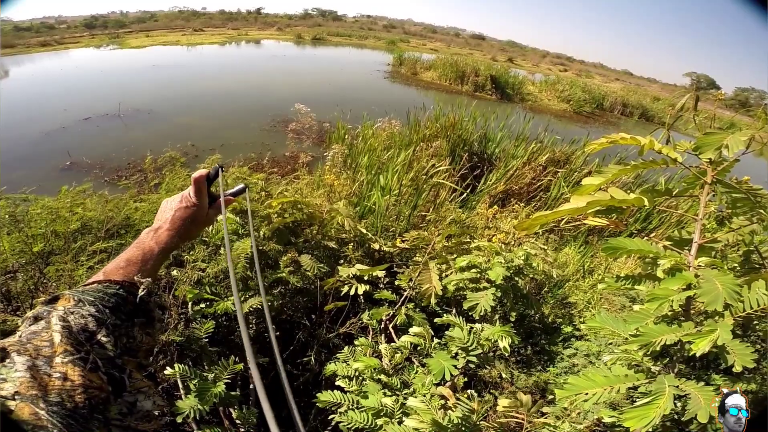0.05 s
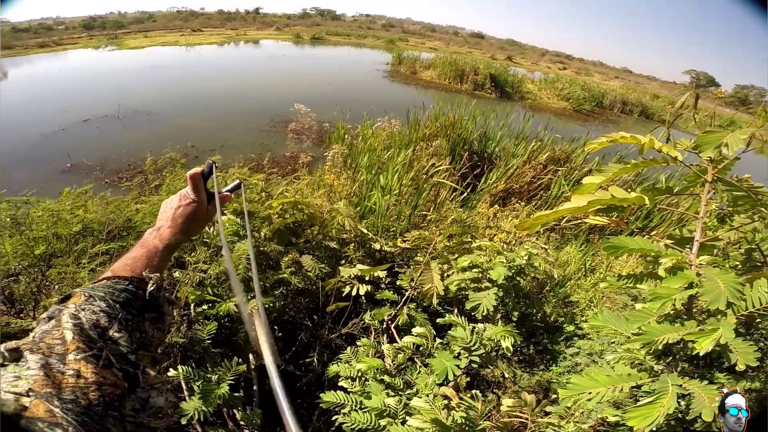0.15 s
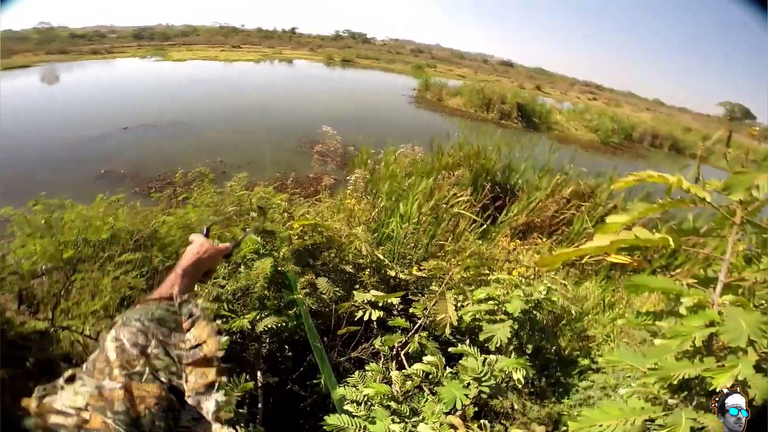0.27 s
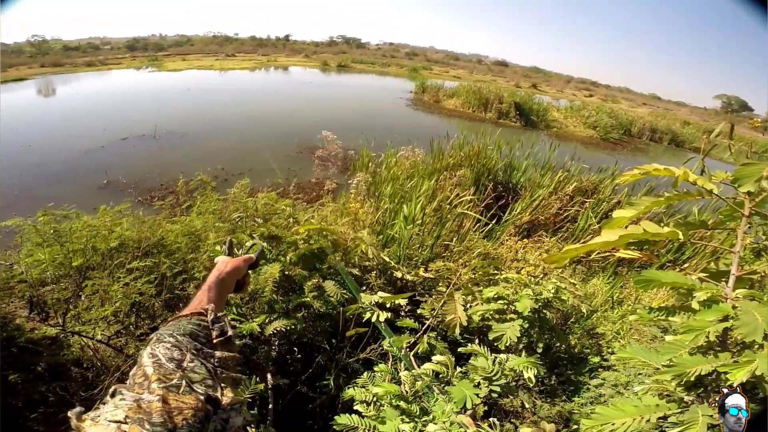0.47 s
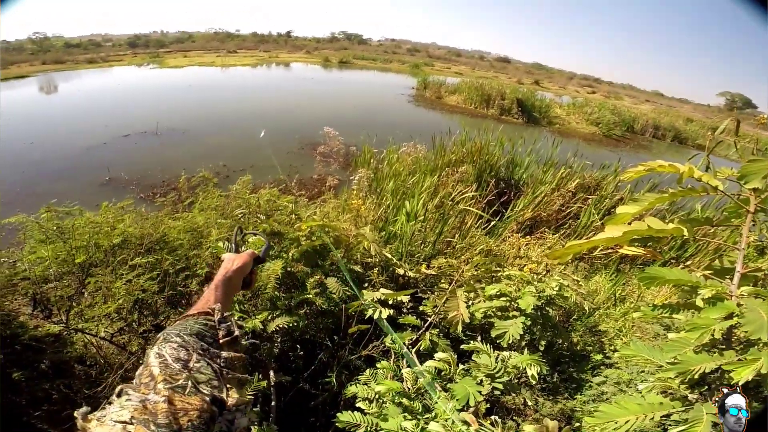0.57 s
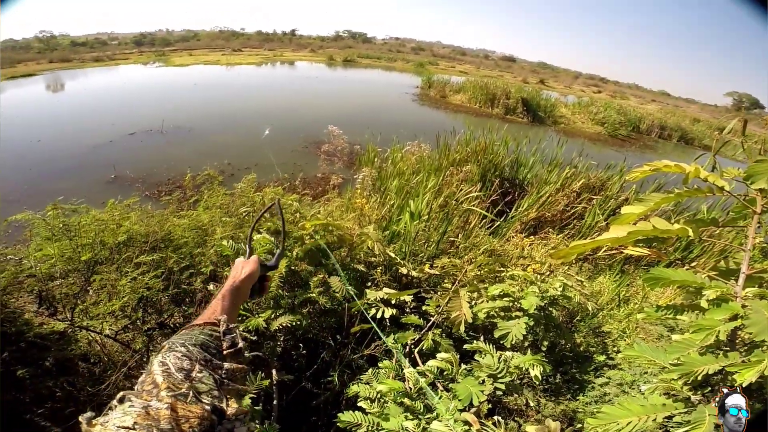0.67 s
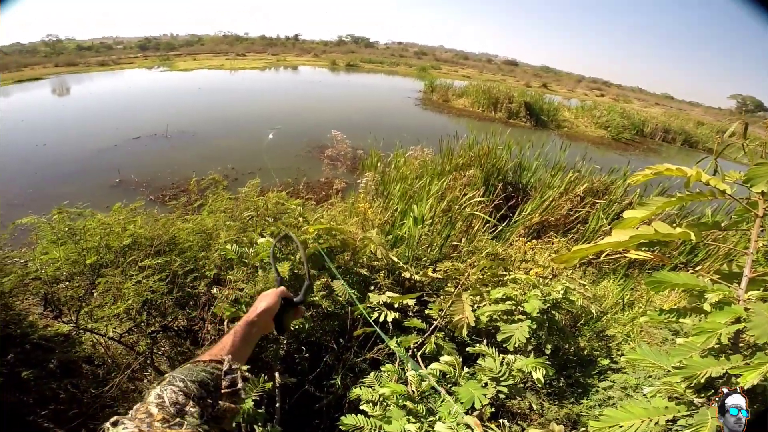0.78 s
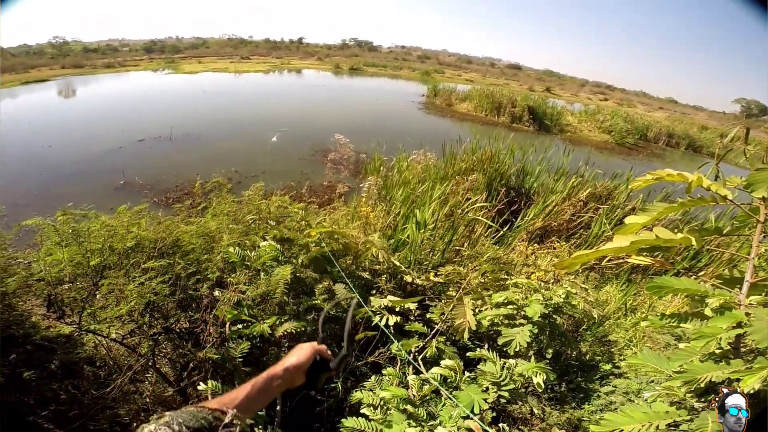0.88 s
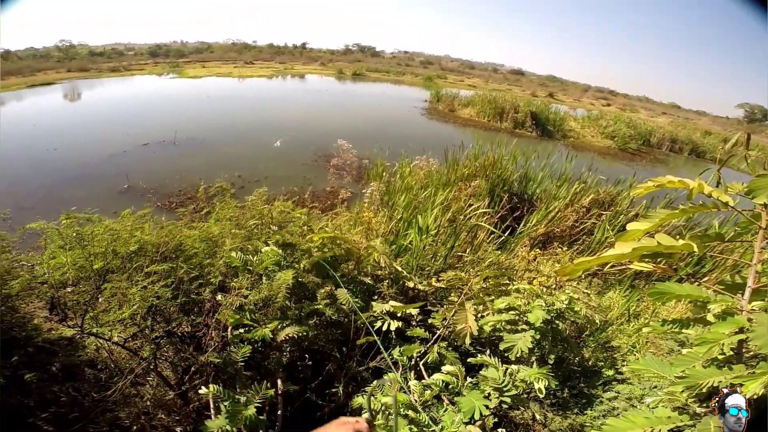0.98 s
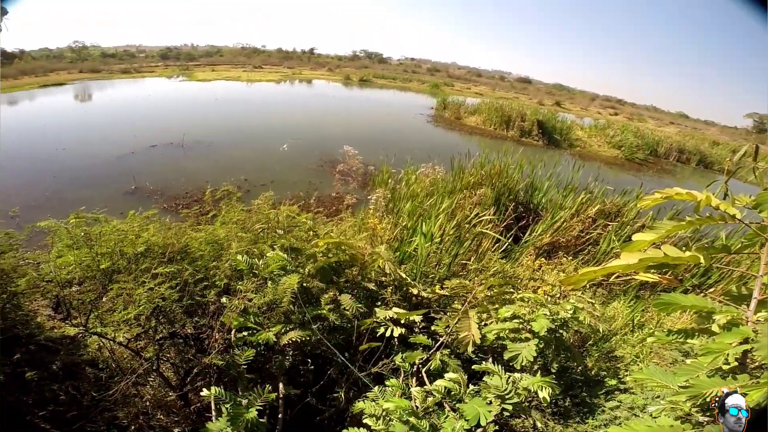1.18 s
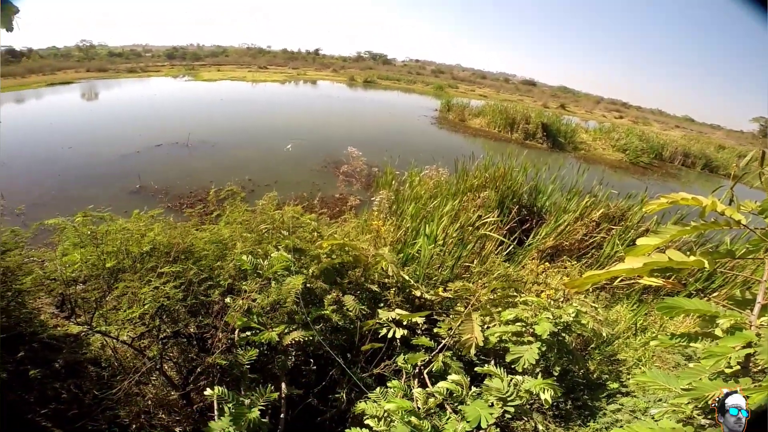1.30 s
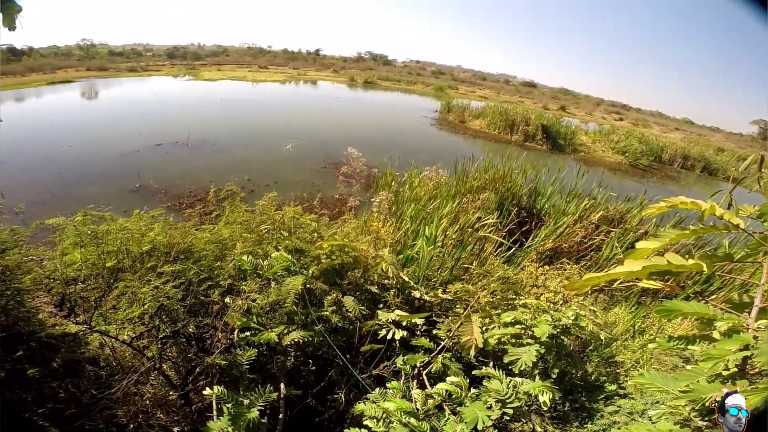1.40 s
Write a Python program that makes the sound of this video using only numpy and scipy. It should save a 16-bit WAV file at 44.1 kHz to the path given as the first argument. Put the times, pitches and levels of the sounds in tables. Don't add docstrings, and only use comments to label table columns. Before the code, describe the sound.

Sharp rubber slap of a slingshot, a short falling line whine, crickets and cicadas beside a pond

```python
import sys
import numpy as np
from scipy import signal
from scipy.fft import rfft, irfft
from scipy.io import wavfile

SR = 44100
rng = np.random.default_rng(int(sys.argv[2]) if len(sys.argv) > 2 else 0)


def output_pcm(signal):
    pcm = np.clip(np.atleast_2d(signal).T, -1, 1) * 32767
    wavfile.write(sys.argv[1], SR, np.round(pcm).astype(np.int16))


def boost(x):
    u = np.asarray(x, float) / 20
    return 10 ** u


N = 63945
T = np.arange(N) / SR

# f/Hz, density [dB per Hz]
RUBBER_COLOUR = [(59, -41), (100, -3.5), (917, -4), (1060, -5), (1620, -6.5), (3250, -10.5), (5510, -13.5),
                 (15500, -34.5)]
JERK_S = 0.593


def rms_one(x):
    return x / np.sqrt(np.mean(x ** 2) + 1e-20)


def in_time(rows):
    s, *columns = np.transpose(rows)
    return [np.interp(T, s, c) for c in columns]


def drift(hz):
    r = np.exp(-2 * np.pi * hz / SR)
    wander = signal.lfilter([1], [1, -2 * r, r * r], rng.standard_normal(N + SR))
    return rms_one(wander[SR:])


def coloured(points):
    hz, db = np.transpose(points)
    grid = np.maximum(np.arange(N // 2 + 1) * SR / N, 1)
    gain = boost(np.interp(np.log(grid), np.log(hz), db, left=-90, right=-90))
    return rms_one(irfft(rfft(rng.standard_normal(N)) * gain, N))


def lowpass(x, hz):
    return signal.sosfilt(signal.butter(2, hz, fs=SR, output="sos"), x)


def bandpass(x, low_hz, high_hz):
    return signal.sosfilt(signal.butter(2, [low_hz, high_hz], "band", fs=SR, output="sos"), x)


def resonate(x, hz, width_hz):
    r = np.exp(-np.pi * width_hz / SR)
    poles = [1, -2 * r * np.cos(2 * np.pi * hz / SR), r * r]
    return signal.lfilter([(1 - r * r) / 2, 0, (r * r - 1) / 2], poles, x)


def band(hz, width_hz):
    x = rng.standard_normal(N)
    for _ in range(4):
        x = resonate(x, hz, width_hz * 2.22)
    return rms_one(x)


def after(s, t60):
    since = T - s
    return (since >= 0) * boost(-60 * np.clip(since, 0, 3 * t60) / t60)


def rings(rows, sign):
    load_cycles = 1.12
    out = 0
    for s, db, hz, t60 in rows:
        swell = 1 - np.exp(-np.clip((T - s) * hz / load_cycles * 3, 0, 30) ** 2)
        out = out + sign * boost(db) * swell * after(s, t60) * np.sin(2 * np.pi * hz * (T - s))
    return out


def air():
    # f/Hz, density [dB per Hz]
    air_colour = [(20, -10), (60, -3), (140, -8), (200, -6), (320, -14), (1250, -13.5), (1800, -25),
                  (6500, -37), (15500, -51.5)]
    # f/Hz, width [Hz], level/dB, change [dB per s]
    drone_bands = [(478, 40, -59.5, -1.5), (1088, 220, -59, -5.5), (683, 60, -53, -11),
                   (204.3, 45, -57, -4.5)]
    floor_db, rise_db, rise_s, sway_db = -46.5, 2.5, 0.32, 0.7
    level = floor_db + rise_db * np.clip(T / rise_s, 0, 1) + sway_db * drift(3.9)
    drone = sum(boost(db + change_db * T) * band(hz, width) for hz, width, db, change_db in drone_bands)
    return boost(level) * coloured(air_colour) + drone


def chorus():
    # f/Hz, width [Hz], level/dB, throbs [per s], change [dB per s]
    singers = [(4300, 300, -62, 110, -2.5), (4600, 265, -54.5, 71, 0.3), (4830, 61, -54, 76, -4),
               (5290, 400, -56.5, 18, 3), (5735, 18, -58, 26, -2.5), (7190, 520, -65.5, 54, -0.7),
               (7620, 170, -65, 110, 0.8), (9200, 1400, -73, 61, 1.5)]
    throb_db = 1
    out = 0
    for hz, width, db, rate, change_db in singers:
        throb = throb_db * np.sin(2 * np.pi * rate * T + 0.9 * drift(3.8))
        level = db + change_db * T + throb + 0.62 * drift(0.91)
        out = out + boost(level) * band(hz, width)
    return out


def cricket():
    chirps_per_s, chirp_s = 25.8, 0.778
    wing_hz, wing_db, fade_db_per_s, octave_db, jitter = 5750, -51, 3.5, -24, 0.002
    chirp = np.clip(0.45 + np.cos(2 * np.pi * chirps_per_s * (T - chirp_s)), 0, 1)
    breath = 0
    for hz, db in ((5630, -58), (5480, -59)):
        breath = breath + boost(db + 0.74 * drift(3.8)) * (chirp + 0.2) * band(hz, 61)
    phase = 2 * np.pi * wing_hz * np.cumsum(1 + jitter * drift(81)) / SR
    wing = np.sin(phase) + boost(octave_db) * np.sin(2 * phase)
    return breath + boost(wing_db - fade_db_per_s * T + 0.66 * drift(70)) * chirp * wing


def pump():
    # t/s, level/dB
    throb = [(0, -40), (.05, -48.5), (.19, -42.5), (.30, -42.5), (.42, -41.5), (.46, -38.5), (.67, -38.5),
             (.99, -37.5), (1.03, -44.5), (1.17, -39.5), (1.27, -41), (1.38, -40.5), (1.45, -39.5)]
    # multiple of the engine rate, level/dB
    orders = [(1, -20), (2, 2), (3, -14), (4, -3.5), (5, -14), (6, -11.5), (7, -23), (8, -31.5),
              (14, -15.5), (30, -16)]
    engine_hz, firing_s, wobble_db = 34.72, 0.6985, 2.2
    db, = in_time(throb)
    phase = 2 * np.pi * engine_hz * (T - firing_s)
    tone = sum(boost(d + wobble_db * drift(10.6)) * np.cos(k * phase) for k, d in orders)
    return boost(db) * tone * 1.045


def knocks():
    # t/s, level/dB, f/Hz, t60 [s]
    thumps = [
        (.231, -15, 193, 0.026),
        (.238, -10.5, 93.5, 0.022),
        (.248, -20, 220, 0.022),
        (.30, -24.5, 21.4, 0.55),
        (.368, -11, 63.5, 0.03),
        (.375, -41, 27.4, 0.34),
    ]
    return rings(thumps, -1.17)


def line_hiss():
    # t/s, level/dB
    hiss = [
        (.23, -89),
        (.26, -57),
        (.375, -54),
        (.392, -50),
        (.66, -52.5),
        (.71, -60),
        (.90, -78),
        (1.0, -92),
    ]
    # f/Hz, density [dB per Hz]
    hiss_colour = [(3650, -28), (6200, -8), (7140, -23), (8360, -10), (9310, -3.5), (11000, -3),
                   (15500, -29)]
    db, = in_time(hiss)
    return boost(db + 1.8 * drift(28)) * coloured(hiss_colour)


def line_jerk():
    length_s, level_db, top_hz, fork_hz = 0.013, -37.5, 5200, 1700
    pull = np.clip((JERK_S + length_s - T) / 0.0043, 0, 1)
    tail = boost(-11) * after(JERK_S, 0.12)
    rustle = boost(-19) * after(JERK_S, 0.9)
    gate = np.clip((T - JERK_S) / 0.0045, 0, 1) * (pull + tail + rustle)
    scrape = bandpass(rng.standard_normal(N), 300, top_hz)
    scrape = lowpass(scrape, 2 * top_hz)
    scrape = scrape + 1.5 * resonate(scrape, fork_hz, fork_hz)
    return boost(level_db) * gate * rms_one(scrape)


def spool():
    # t/s, loops [per s], level/dB, brightness [dB per octave]
    loops = [(.272, 290, -43, -6.5), (.292, 301, -35.5, 0.5), (.325, 293, -36, 0), (.395, 281, -39, 0),
             (.411, 281, -35.5, -2), (.423, 275, -40, 2), (.46, 271, -36.5, -1.5), (.495, 271, -36.5, 0),
             (.52, 266, -39, -1), (.555, 268, -39, -1.5), (.571, 264, -36.5, -2), (.593, 258, -37.5, 2)]
    # f/Hz, width [Hz], level/dB
    spool_modes = [(609, 106, 0), (840, 200, -21), (1145, 138, -4.5), (1557, 66, -9), (1918, 113, -1.5),
                   (2480, 230, -16), (3320, 340, -24)]
    # f/Hz, density [dB per Hz]
    lip_colour = [(150, -19), (500, -0.5), (1200, -4), (2200, -2.5), (3000, -14), (4600, -5), (6500, -22.5),
                  (15000, -26)]
    jitter, wobble_db, valley_db, top_hz = 0.008, 2.5, -19, 3800
    rub_db, last_loop_s = -4, 0.574
    rate, db, bright_db = in_time(loops)
    phase = 2 * np.pi * np.cumsum(rate * (1 + jitter * drift(49))) / SR
    tone = 0
    for k in range(2, 16):
        hz = k * rate
        body = sum(boost(d) / np.sqrt(1 + (2 * (hz - f) / w) ** 4) for f, w, d in spool_modes)
        valley = boost(valley_db) / (1 + (hz / top_hz) ** 4)
        gain = boost(bright_db * np.log2(k / 4) + wobble_db * drift(45))
        tone = tone + (body + valley) * gain * np.cos(k * phase + rng.uniform(0, 6.04))
    tone = tone * np.clip((last_loop_s - T) * 500, 0, 1)
    rub = coloured(lip_colour) * (1 + 0.11 * np.cos(phase)) * boost(2.6 * drift(32))
    running = (T > loops[0][0]) & (T < loops[-1][0])
    return running * boost(db) * (1.22 * tone + boost(rub_db) * rub)


def slack_bands():
    start_s = 0.231
    rattle = boost(-26.5 + 2.8 * drift(118)) * after(start_s, 0.31) * coloured(RUBBER_COLOUR)
    whip = boost(-45.5) * after(0.250, 0.25) * band(12600, 2700)
    ticks_per_s = 3800
    ticks = (rng.random(N) < ticks_per_s / SR) * rng.standard_normal(N) * after(start_s, 0.16)
    crackle = ticks + 1e-18
    for _ in range(3):
        crackle = resonate(crackle, 2600, 5000)
    return rattle + whip + boost(-22) * 2.8 * crackle


def contacts():
    # t/s, peak level/dB, f/Hz, t60 [s]
    snaps = [(0.2283, -10.5, 704, 0.0037), (0.2296, -9.5, 2440, 0.003), (0.2312, -11, 1565, 0.01),
             (.2317, -9, 2350, 0.0044), (0.233, -4.5, 4600, 0.0024), (0.2318, -23.5, 7400, 0.006),
             (0.2348, -9, 3420, 0.0033), (.2356, -21, 5600, 0.0016), (0.2360, -2.5, 1730, 0.0032),
             (.2340, -19, 510, 0.019), (0.2493, -8, 5660, 0.0053), (.2509, 2.5, 3600, 0.0014),
             (.2520, -11, 2600, 0.0061), (0.2527, -25.5, 464, 0.038), (.2517, 1, 4600, 0.002),
             (0.251, -8.5, 5140, 0.0012), (.2505, -10, 1070, 0.022), (0.254, -11.5, 1484, 0.017),
             (.2545, -7, 2190, 0.004), (0.2549, -4.5, 1920, 0.0063), (0.2581, -15, 2930, 0.0046),
             (.2600, -14.5, 780, 0.017), (0.2614, -7.5, 2080, 0.0032), (0.2619, -5.5, 3460, 0.0026),
             (0.2621, -10, 5400, 0.0014), (.2640, -18, 2280, 0.004), (0.262, -30, 11000, .001),
             (0.2685, -19, 4600, 0.0059), (0.2682, -17, 1830, 0.0083), (0.2732, -14, 850, 0.006),
             (0.2748, -27, 3000, 0.0032), (.2775, -23.5, 1170, 0.011), (0.285, -13.5, 3300, 0.007),
             (0.2884, -17.5, 920, 0.011), (.3125, -34, 6500, 0.0062), (.3348, -20, 8700, 0.00074),
             (0.332, -29.5, 1485, 0.044), (0.432, -31, 6300, 0.0023), (0.6043, -18.5, 420, 0.0099),
             (0.6095, -21, 516, 0.019), (.6020, -45, 4800, 0.003), (.6700, -29, 4000, 0.0018),
             (1.105, -53, 3000, 0.0021), (1.290, -37, 4000, .003), (1.325, -23, 4300, 0.0012)]
    spit_db, spit_t60_s, full_hz, top_hz = -13, 0.0036, 2900, 7300
    spit = 0
    for s, db, hz, _ in snaps:
        spit = spit + boost(db + spit_db) * min(hz / full_hz, 1) * after(s, spit_t60_s)
    return rings(snaps, 1.0) + lowpass(coloured(RUBBER_COLOUR) * spit, top_hz)


def slap():
    slap_s, level_db, ring_hz, rise_s, fall_s = 0.2530, -2.5, 3240, 0.0007, 0.0012
    rasp_db, rasp_s = -14, 0.0028
    since = T - slap_s
    shape = np.exp(-(since / np.where(since < 0, rise_s, fall_s)) ** 2)
    ring = boost(level_db) * shape * np.cos(2 * np.pi * ring_hz * since)
    rasp = bandpass(coloured(RUBBER_COLOUR), 1000, 6500)
    return ring + boost(rasp_db) * np.exp(-(since / rasp_s) ** 2) * rasp


def scene():
    background = air() + chorus() + cricket() + pump()
    tether = line_hiss() + line_jerk() + spool()
    shot = knocks() + slack_bands() + contacts() + slap()
    return (background + tether + shot)[None]


def band_limit(x):
    return signal.sosfilt(signal.butter(12, 15750, fs=SR, output="sos"), x)


def record(dry):
    overload, mic_top_hz, cutoff_hz = 0.92, 15000, 16500
    rounded = dry / (1 + (dry / overload) ** 4) ** 0.25
    dull = signal.sosfilt(signal.butter(6, mic_top_hz, fs=SR, output="sos"), rounded)
    finished = signal.sosfilt(signal.cheby2(12, 60, cutoff_hz, fs=SR, output="sos"), dull)
    return band_limit(finished)


dry = scene()
out = record(dry)
output_pcm(out)
```